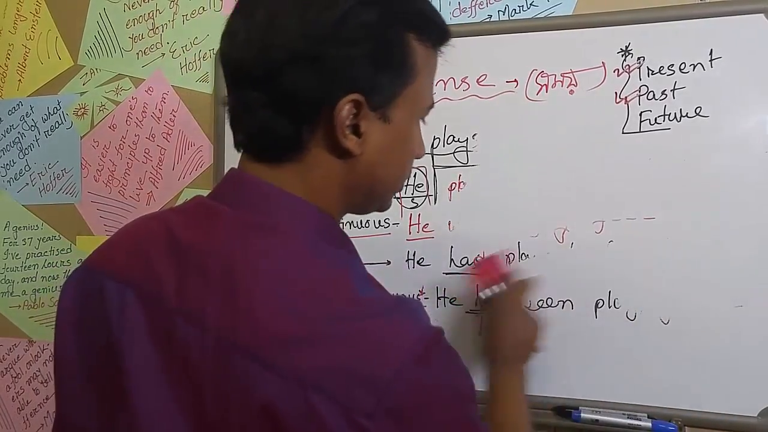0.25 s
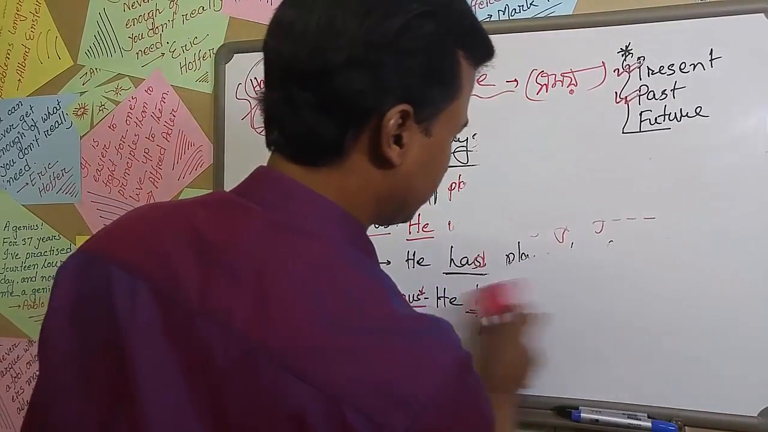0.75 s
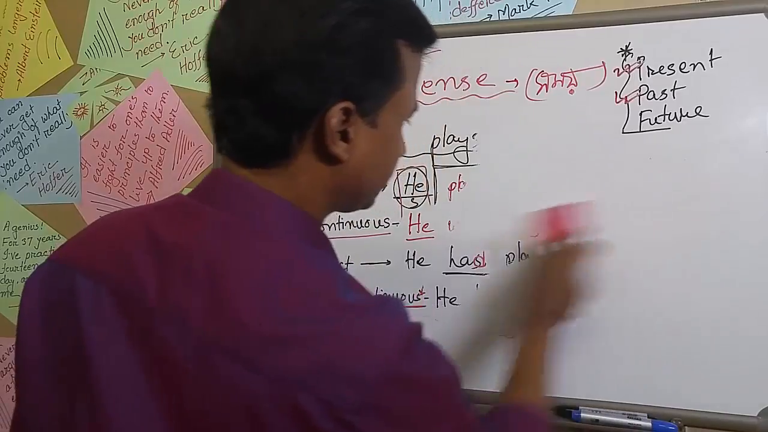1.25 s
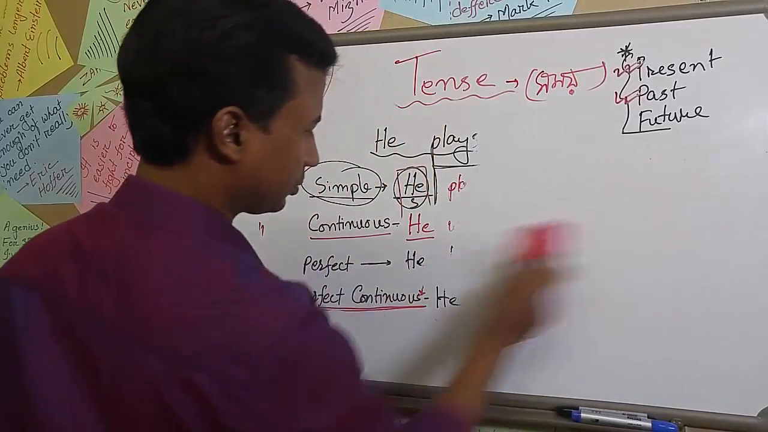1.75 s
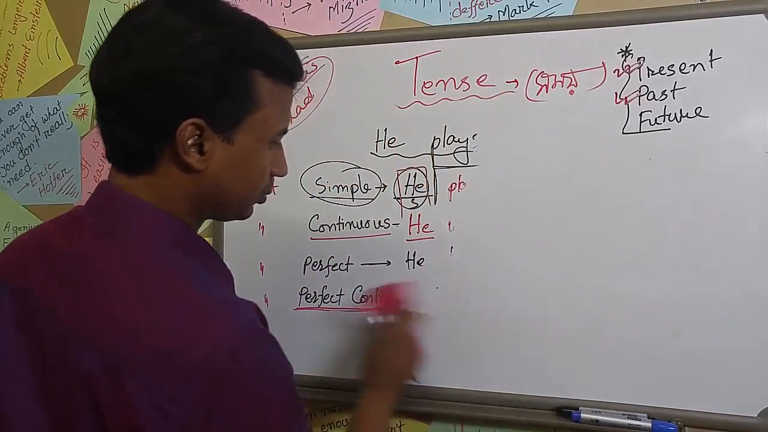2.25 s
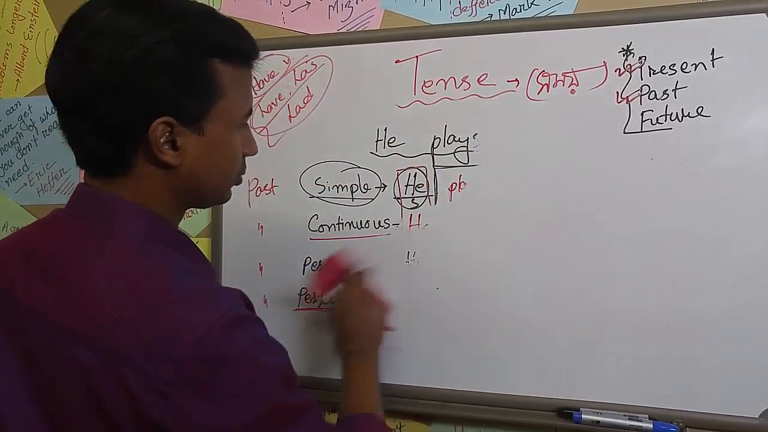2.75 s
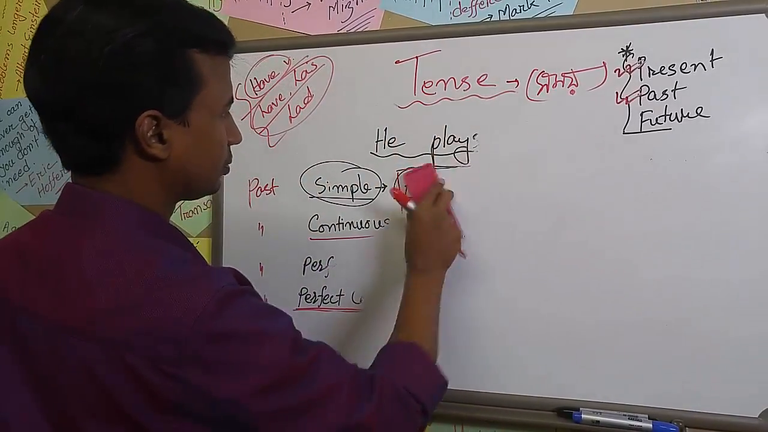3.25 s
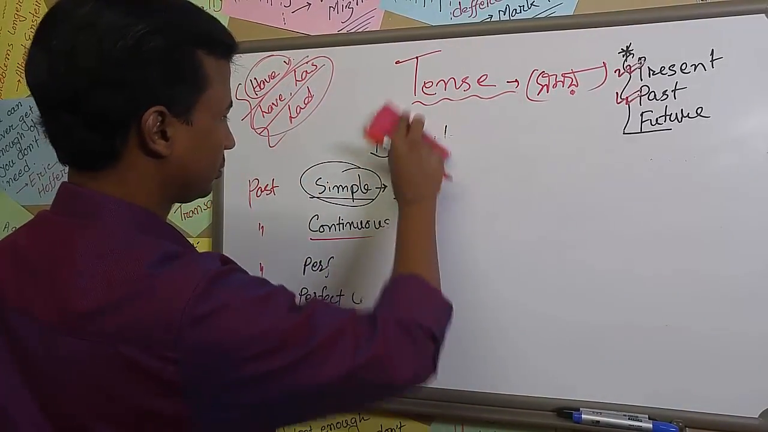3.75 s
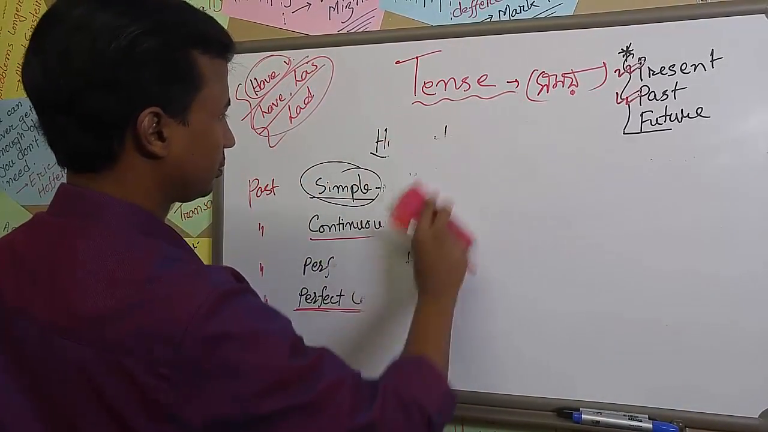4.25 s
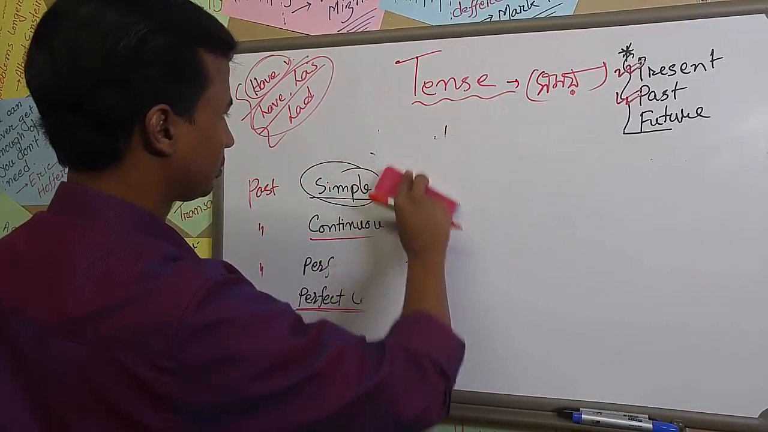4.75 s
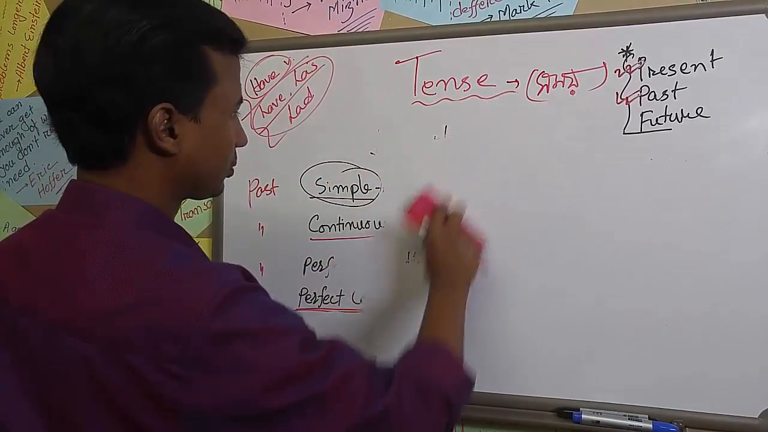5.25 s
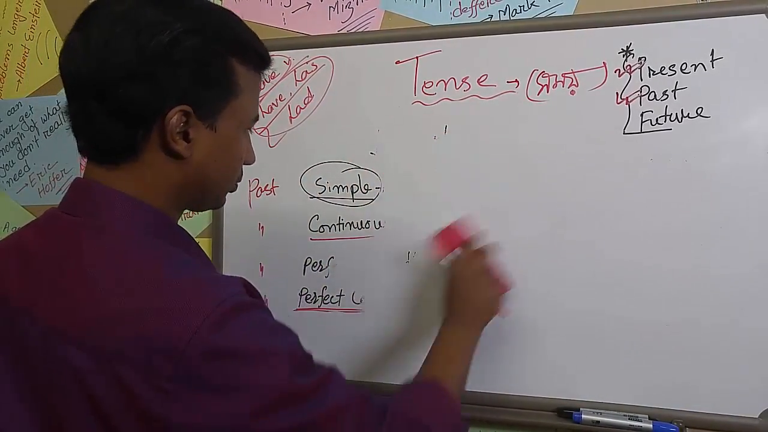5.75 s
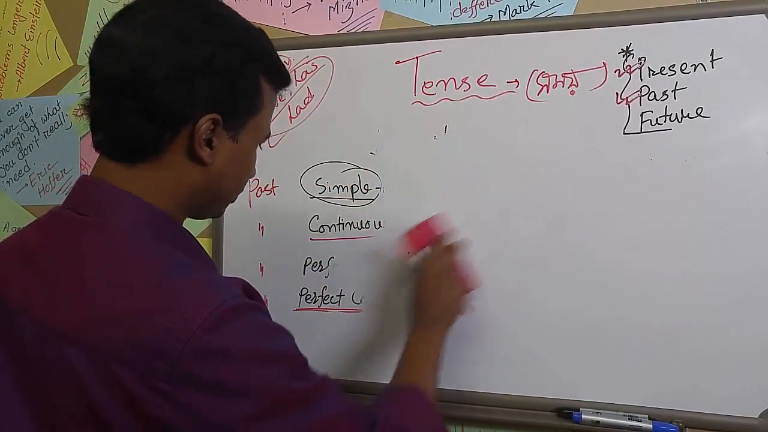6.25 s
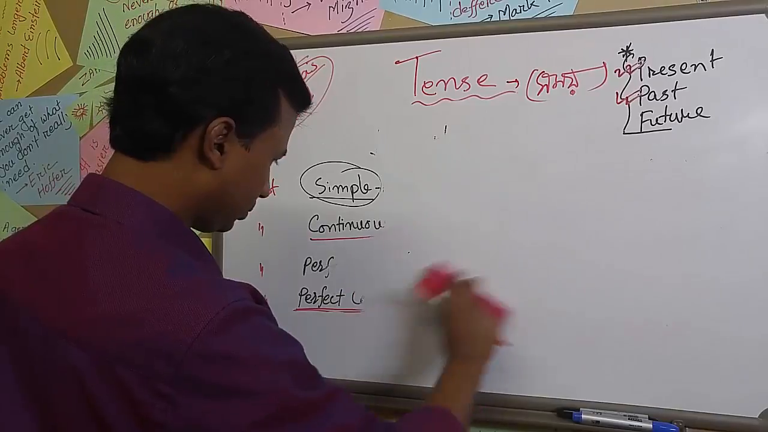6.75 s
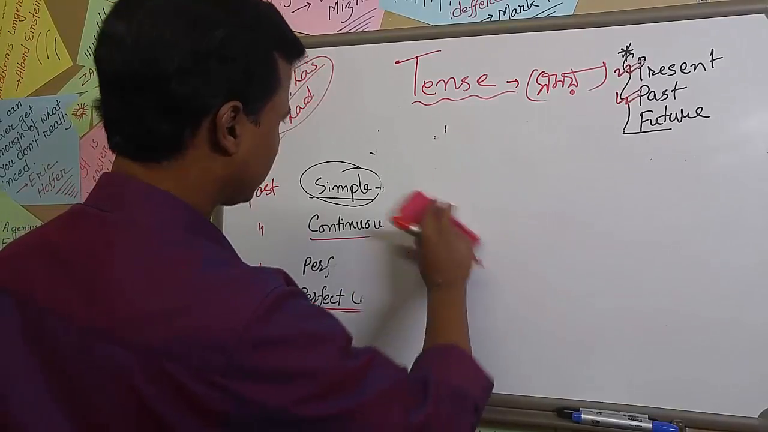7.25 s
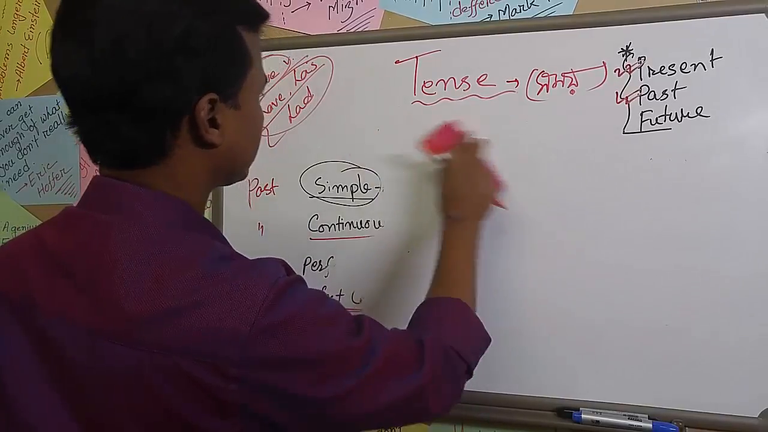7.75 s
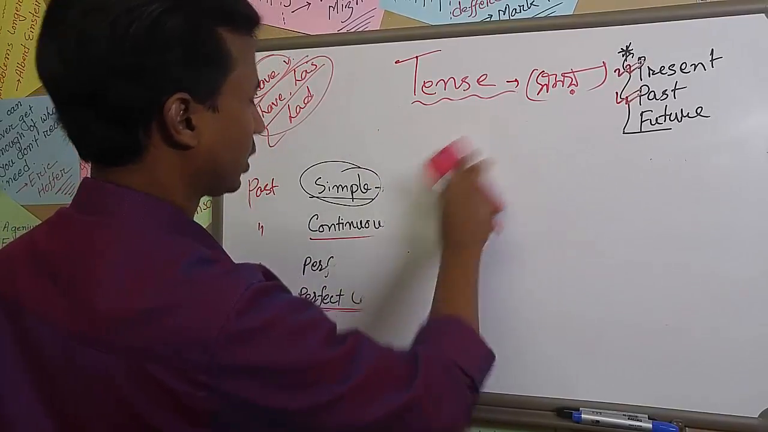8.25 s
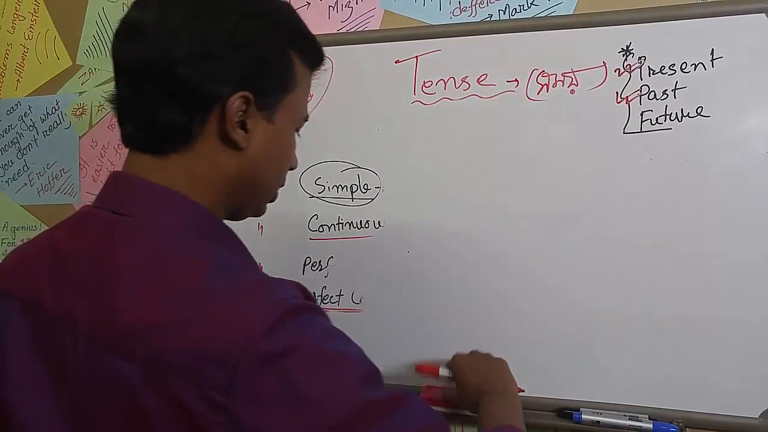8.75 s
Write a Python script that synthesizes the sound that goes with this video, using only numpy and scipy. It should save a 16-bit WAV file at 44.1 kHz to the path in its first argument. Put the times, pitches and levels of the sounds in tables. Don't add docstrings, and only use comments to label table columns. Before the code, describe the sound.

A felt eraser swishes back and forth across a whiteboard in dry, hissing strokes, with a few hard knocks, then lands clunking on the tray.

```python
import sys
import numpy as np
from scipy import signal
from scipy.fft import rfft, irfft, next_fast_len
from scipy.io import wavfile
from scipy.ndimage import uniform_filter1d, map_coordinates

SR = 44100
rng = np.random.default_rng(int(sys.argv[2]) if len(sys.argv) > 2 else 0)


def to_wav(sig):
    pcm = np.clip(np.atleast_2d(sig), -1, 1) * 32767
    pcm = np.round(pcm).astype(np.int16)
    wavfile.write(sys.argv[1], SR, pcm.T)


def natural_amplitude(level_db):
    exponent = np.asarray(level_db, float) / 20
    return 10 ** exponent


N = 396900

# pitch_hz, level_db [dB per Hz]
FELT = [(2350, -41), (4000, -18.5), (6000, -10), (7700, -6.5), (8260, -1), (8800, 1.5), (10000, -11),
        (11000, -35)]
# pitch_hz, level_db [dB per Hz]
SHEEN = [(9000, -22.5), (10300, 2.5), (11300, -1), (12800, -3), (13800, -13.5), (15500, -35.5)]
# pitch_hz, level_db [dB per Hz]
PRESS = [(900, -14), (1500, -9.5), (2300, -2.5), (3600, -0.5), (4600, 1), (6500, -5), (7600, -18)]
# pitch_hz, level_db [dB per Hz]
BOARD = [(120, -17.5), (220, -1), (420, -3), (506, -1.5), (680, -0.5), (1000, -5), (1600, -9), (2500, -22)]
# pitch_hz, level_db [dB per Hz]
RUMBLE = [(15, -35), (30, -8), (60, 1), (120, -6), (200, -9), (320, -31)]
# time_s, level_db
LEAN = [(0.0, -96), (0.25, -75.5), (0.42, -78.5), (0.82, -78.5), (1.1, -78), (3.11, -81), (3.16, -83.5),
        (3.93, -79.5), (4.18, -79.5), (4.76, -82), (4.96, -81), (6.64, -80.5), (7.09, -81), (7.42, -78),
        (8.0, -81.5), (8.52, -81.5), (8.82, -71), (9.0, -71)]


def eraser():
    hiss_db, press_db = strokes()
    sway_s = 0.29
    sway_db = uniform_filter1d(hiss_db, round(sway_s * SR))
    hiss_db = hiss_db + hush_db() + 0.36 * wobble(23)
    felt = natural_amplitude(hiss_db + 1.0) * rush(FELT, patchy_db=2.8, grain_db=0.33)

    sheen_db = -77.5 + 0.63 * (hiss_db + 68.0)
    sheen = natural_amplitude(sheen_db) * rush(SHEEN, patchy_db=5.0, grain_db=-1.5)

    lower_db = hiss_db + np.minimum(press_db, -3) + 1.5
    press = natural_amplitude(lower_db) * rush(PRESS, patchy_db=3.0, grain_db=0.56)

    board_db = curves(LEAN)[0] + 6 + 0.48 * (hiss_db + 67.5)
    board_db = np.minimum(board_db, -59)
    murmur = natural_amplitude(board_db) * rush(BOARD, patchy_db=3.0, grain_db=-1.1)

    rumble_db = -76.5 + 0.39 * (sway_db + 64.5) + 1.9 * wobble(9)
    rumble = natural_amplitude(rumble_db) * rush(RUMBLE, patchy_db=2.5, size=4096)
    return felt + sheen + press + murmur + rumble


# top_speed_s, hiss_level_db, speeding_up_s, slowing_down_s, pressure_db
PAD_STROKES = [(0.178, -65.5, 0.43, 0.038, -12), (0.297, -48, 0.023, 0.1, -3.5),
               (0.463, -51.5, 0.26, 0.061, -11), (0.672, -59.5, 0.28, 0.1, -9.5),
               (0.756, -42, 0.026, 0.059, -10), (0.955, -64.5, 0.39, 0.078, -7), (0.98, -59, 0.078, 0.063, -6),
               (1.065, -43.5, 0.03, 0.14, -3), (1.08, -40, 0.011, 0.05, -16), (1.191, -52.5, 0.21, 0.14, -10),
               (1.508, -46, 0.15, 0.088, -8.5), (1.634, -63.5, 0.12, 0.034, -7.5), (1.688, -63, 0.12, 0.33, -10),
               (1.969, -60.5, 0.15, 0.014, -9.5), (2.033, -42, 0.078, 0.051, -7),
               (2.171, -52, 0.25, 0.13, -12.5), (2.478, -59.5, 0.3, 0.077, -9), (2.642, -54, 0.16, 0.096, -10.5),
               (2.684, -58, 0.019, 0.14, -16), (2.912, -41, 0.084, 0.097, -12), (3.128, -41, 0.062, 0.11, -12),
               (3.426, -60, 0.14, 0.044, -7.5), (3.541, -62, 0.18, 0.13, -8.5), (3.696, -50.5, 0.087, 0.083, -10),
        (3.841, -66.5, 0.15, 0.1, -12), (4.053, -50.5, 0.15, 0.1, -9), (4.198, -58, 0.062, 0.19, -11),
        (4.453, -61.5, 0.25, 0.084, -9.5), (4.659, -66, 0.34, 0.2, -9), (4.854, -62, 0.19, 0.14, -9),
        (5.053, -67.5, 0.27, 0.076, -11.5), (5.285, -61, 0.24, 0.12, -10.5), (5.448, -63, 0.14, 0.32, -10),
        (5.696, -63.5, 0.16, 0.32, -10), (5.8, -50.5, 0.083, 0.054, -10), (5.952, -61.5, 0.17, 0.14, -11.5),
        (6.11, -62, 0.11, 0.11, -11.5), (6.18, -65, 0.042, 0.08, -27), (6.188, -52.5, 0.12, 0.028, -14.5),
        (6.279, -55, 0.12, 0.097, -13.5), (6.506, -57.5, 0.18, 0.064, -12.5),
        (6.62, -59.5, 0.18, 0.09, -14),
               (6.792, -58, 0.17, 0.16, -8.5), (6.932, -58.5, 0.15, 0.093, -12),
             (7.103, -69, 0.04, 0.95, -11), (7.312, -64, 0.414, 0.14, -13.5),
             (7.442, -63, 0.14, 0.062, -11), (7.549, -61.5, 0.28, 0.13, -13),
             (7.663, -58, 0.13, 0.12, -13.5), (7.909, -63, 0.22, 0.21, -10),
             (8.116, -60.5, 0.089, 0.23, -12.5), (8.252, -64.5, 0.044, 0.21, -15),
             (8.41, -67, 0.12, 0.81, -6), (8.459, -52.5, 0.011, 0.1, -11), (8.85, -69.5, 0.16, 0.61, 2),
             (8.928, -52, 0.015, 0.066, -3),
               (2.82, -63.5, 0.085, 0.077, -9), (3.03, -70, .08, 0.068, -6), (3.103, -47, 0.032, 0.041, -15),
          (3.34, -72.5, 0.15, 0.091, -6), (.55, -73, .06, 0.089, -4), (5.36, -89, .06, 0.053, -11),
          (1.43, -55, .03, 0.069, -1)]


def strokes():
    depth_db, bend = 29.5, 1.39
    rest_db, rest_press_db = -88, -4.5
    t = np.arange(N // 64 + 2) * 64 / SR
    rows = PAD_STROKES
    s, db, rise, fall, press_db = np.transpose(rows)[:, :, None]
    away = np.where(t < s, (s - t) / rise, (t - s) / fall)
    power = natural_amplitude(2 * (db - depth_db * away ** bend))
    hiss = power.sum(axis=0) + natural_amplitude(2 * rest_db)
    lower = (power * natural_amplitude(2 * press_db)).sum(axis=0) + natural_amplitude(2 * (rest_db + rest_press_db))
    return curves(np.transpose([t, 10 * np.log10(hiss), 10 * np.log10(lower / hiss)]))


def hush_db():
    lift_s, set_down_s, fade_s = 8.665, 8.795, 0.023
    t = np.arange(N) / SR
    in_air_s = np.minimum(t - lift_s, set_down_s - t)
    return -8.5 * np.clip(in_air_s / fade_s + 0.5, 0, 1)


# pitch_hz, width_hz, level_db
FLAT = [(666, 49, -3.5), (803, 82, -7.5), (938, 20.2, -17), (1179, 26, -7), (1330, 66, -10.5),
        (1692, 75, -17), (2246, 29.3, -17.5), (2420, 26, -15), (2768, 39, -16.5), (2960, 32, -13),
        (3600, 20, -20.5), (3830, 24, -16), (3915, 44, -30)]
BELLY = [(265, 58, -2.6), (331, 82, 0.67)]
CHIRP = [(5700, 150, -12), (7250, 170, 2), (8150, 170, 2), (9170, 200, -5)]
NUDGE = [(2084, 70, 0)]
TILTED = [(342, 115, -10.5), (673, 54, -1.5), (909, 33, -3.5), (1144, 37, -11), (1524, 150, -13),
          (1970, 52, -27), (2410, 64, -22)]
EDGE = [(282, 35, -1.5), (618, 18, -4.5), (772, 60, -4), (1022, 19, -16), (1390, 33, -12)]
CORNER = [(638, 70, 2), (894, 150, -0.5), (1524, 19, -7)]
PANEL = [(268, 42, -6.5), (650, 50, -21), (1100, 24, -30.5)]
GRIP = [(617, 27, -12.5), (838, 39, -5.5), (1057, 83, -1), (1550, 53, -10.5), (1750, 27, -22)]
SHELL = [(1025, 21, -12.5), (1390, 42, -10.5), (1860, 31, -9), (2057, 70, -3.5), (2287, 39, 0)]
SCUFF = [(3750, 68, -13), (7110, 150, 4), (7840, 170, 3)]
LIP = [(230, 125, -5), (655, 150, 0.5), (990, 20, -8), (1273, 110, -7.5), (1860, 28, -21.5),
       (2720, 85, -34.5)]
TRAY = [(176, 16, 5), (223, 49, 3), (372, 17, -18.5)]
TRAY_TOP = [(583, 44, -1), (723, 55, 0.5), (1003, 41, -14), (1520, 17, -22), (1870, 55, -23.5),
            (2055, 49, -25), (3160, 38, -51), (3550, 8.9, -25), (3800, 21, -34), (2280, 34, -28),
            (4700, 44, -34), (5750, 42, -31)]
SQUEAK = [(5200, 200, 0), (8240, 140, -5), (9100, 280, 6)]
DRONE = [(424, 63, -2), (714, 180, 3), (970, 61, -3)]
# start_s, peak_level_db, rise_s, rattle_t60_s, hardness_db [dB per octave]
HITS = [(FLAT, [(1.0598, -22, .0006, 0.075, -1), (1.072, -22.5, .004, 0.087, -1.5),
        (1.083, -30, .003, 0.089, -1)]), (BELLY, [(1.0615, -23, .003, 0.1, 6)]),
        (CHIRP, [(.288, -41.5, .004, 0.21, 0)]), (NUDGE, [(8.896, -62, .004, .12, 0),
        (8.931, -48.5, .003, .05, 0), (1.047, -53.5, 0.0042, .06, 0)]),
        (TILTED, [(.2885, -34, .002, 0.038, 0), (.295, -32, .002, 0.091, -2),
        (.3062, -29.5, .001, 0.041, 0.5)]), (EDGE, [(1.0225, -56, .002, 0.099, 2),
        (1.394, -38, .003, 0.036, 1), (1.404, -43, .006, 0.12, 0)]),
        (CORNER, [(1.999, -47, 0.0031, 0.16, 7.5)]), (PANEL, [(2.089, -32.5, 0.0042, 0.013, -8),
        (2.107, -39.5, .003, 0.014, 0.5), (2.744, -57.5, .004, 0.023, -7.5), (2.762, -56, .003, 0.027, -17),
        (7.208, -45, 0.0063, 0.078, 1.5)]), (GRIP, [(6.764, -46, 0.01, 0.1, 6),
        (6.781, -38.5, 0.00202, 0.054, -0.5)]), (SHELL, [(.745, -53.5, 0.011, 0.11, -10),
        (.962, -56, 0.0072, 0.066, -7.5), (7.208, -42.5, 0.00304, 0.083, 4)]),
        (SCUFF, [(8.449, -46.5, 0.0023, 0.2, 3)]), (LIP, [(8.64, -57.5, .002, 0.12, 12),
        (8.79, -48, 0.017, 0.19, 1)]), (TRAY, [(8.912, -19.5, .008, 0.091, 9),
        (8.953, -30.5, .008, 0.22, 0)]), (TRAY_TOP, [(8.918, -26, 0.004, 0.056, 0.5),
        (8.928, -24, .002, 0.057, 1.5), (8.945, -35, 0.003, .25, 1.5)]),
        (SQUEAK, [(6.16, -40, 0.021, 0.12, 5), (6.26, -50, .03, 0.25, 3)]),
        (LIP, [(8.812, -55.5, .012, 0.24, 1.5)]), (CORNER, [(7.33, -64, .08, 0.43, -16)]),
        (DRONE, [(4.26, -59.5, 0.066, 0.47, -7), (4.79, -63, .04, 0.32, 4), (8.3, -60, .05, 0.37, 13),
        (1.43, -59, .03, 0.17, -10)])]


def knocks():
    out = np.zeros((2, N + SR))
    t = np.arange(SR // 4) / SR
    for body, hits in HITS:
        for s, db, rise, t60, hard_db in hits:
            rattle = rng.standard_normal((2, len(t))) * np.minimum(t / rise, 1) * natural_amplitude(-60 * t / t60)
            rattle[0, round(rise * SR)] += 7.6
            tilted_body = [(c, w, level + hard_db * np.log2(c)) for c, w, level in body]
            ring = ports(rattle, tilted_body)
            peak = np.abs(ring.mean(axis=0)).max()
            out[:, round(s * SR):][:, :len(t)] += natural_amplitude(db) * ring / peak
    return out[:, :N]


# pitch_hz, left_right_likeness
ALIKE_KNOCK = [(100, 0.92), (400, 0.97), (700, 0.67), (1300, 0.18), (15000, .02)]


def ports(pair, body):
    m = next_fast_len(pair.shape[1] + 4096)
    f, z = np.fft.rfftfreq(m, 1 / SR), rfft(pair, m)
    total = 0
    for c, w, db in body:
        mode = (1j * f * 1.8 * w / (c * c - f * f + 1j * f * 1.62 * w)) ** 2
        rung = z * mode
        strength = np.linalg.norm(mode) / np.linalg.norm(rung, axis=1, keepdims=True)
        total = total + natural_amplitude(db) * rung * strength
    return irfft(mixed(*total, f, ALIKE_KNOCK), m)[:, :pair.shape[1]]


# start_s, level_db, pitch_hz, t60_s
THUDS = [(0.293, -58, 103, 0.15), (1.063, -27.5, 140, 0.11), (1.402, -49, 64.4, 0.17),
         (1.408, -44, 151, 0.056), (1.82, -53, 75.4, 0.096), (2.372, -62.5, 122, 0.27),
         (2.748, -54, 193, 0.13), (4.279, -63, 310, 0.12), (4.831, -61.5, 279, 0.14),
         (7.21, -48.5, 140, 0.062), (7.215, -57, 64.6, .15), (8.18, -59, 171, 0.088),
         (8.918, -34.5, 110.4, 0.194)]


def thuds():
    out = np.zeros(N + SR)
    t = np.arange(SR // 2) / SR
    for s, db, hz, t60 in THUDS:
        swell = natural_amplitude(db - 60 * t / t60) * (1 - np.exp(-t / 0.0071))
        out[round(s * SR):][:len(t)] += swell * np.sin(2 * np.pi * hz * t)
    return out[:N]


# start_s, level_db, t60_s
CRACKS = [
    (0.295, -45, 0.15),
    (1.0598, -30, 0.17),
    (1.401, -55, 0.49),
    (8.45, -79, 0.11),
    (8.915, -75, 0.22),
]
# pitch_hz, level_db [dB per Hz]
CRACK = [(500, -15), (900, 1), (1500, -3.5), (3000, 4.5), (7000, -1), (8600, -19), (11000, -11),
         (13000, -22), (15500, -28.5)]


def cracks():
    shape = np.zeros(N + SR)
    t = np.arange(SR // 2) / SR
    for s, db, t60 in CRACKS:
        spray = natural_amplitude(-60 * t / t60) * np.minimum(t / 0.0041, 1)
        click = natural_amplitude(13.5 - 60 * t / 0.0027) * np.minimum(t / 0.0005, 1)
        shape[round(s * SR):][:len(t)] += natural_amplitude(db) * (spray + click)
    return shape[:N] * rush(CRACK, patchy_db=-1.5)


# pitch_hz, level_db [dB per Hz]
AIR = [(120, -11.5), (250, -0.5), (410, 2), (509, -3), (631, 3.5), (1300, -8), (2200, -6.5), (4000, -12.5),
       (7700, -17.5), (8810, -9.5), (10500, -12), (12800, -20), (14200, -28), (15500, -44)]


def room_tone():
    level_db = -76.5 + hush_db() + 0.86 * wobble(2.9) + 0.36 * wobble(9.0)
    return natural_amplitude(level_db) * rush(AIR, patchy_db=3.0)


# pitch_hz, left_right_likeness
ALIKE = [(60, 0.14), (300, 0.25), (700, .17), (1500, 0.067), (15000, 0.037)]


def rush(spectrum, patchy_db, grain_db=0, size=512):
    hop, hz = size // 2, np.fft.rfftfreq(size, 1 / SR)
    shape = (N // hop + 2, len(hz))
    z = rng.standard_normal((2, *shape)) + 1j * rng.standard_normal((2, *shape))
    field = uniform_filter1d(rng.standard_normal(shape), size=6, axis=0)
    field = uniform_filter1d(field, size=3, axis=1)
    z = z * natural_amplitude(along(spectrum, hz) + patchy_db * unit(field))
    frames = irfft(mixed(*z, hz, ALIKE), size) * np.sin(np.pi * np.arange(size) / size)
    pair = (frames[:, 1:, :hop] + frames[:, :-1, hop:]).reshape(2, -1)[:, :N]
    return unit(pair * natural_amplitude(grain_db * wobble(250)))


def mixed(mid, side, hz, alike):
    turn = np.arccos(np.clip(along(alike, hz), -1, 1)) / 2
    left = np.cos(turn) * mid + np.sin(turn) * side
    right = np.cos(turn) * mid - np.sin(turn) * side
    return np.array([left, right])


def unit(x):
    return x / np.sqrt(np.mean(x ** 2) + 1e-20)


def along(points, hz):
    f, v = np.transpose(points)
    return np.interp(np.log(hz + 1), np.log(f + 1), v)


def curves(rows):
    s, *cols = np.transpose(rows)
    return [np.interp(np.arange(N) / SR, s, c) for c in cols]


def wobble(rate):
    knots = rng.standard_normal(N // 100)
    coarse = map_coordinates(knots, [np.arange(N // 16 + 2) * 16 * rate / SR])
    return np.interp(np.arange(N) / 16, np.arange(len(coarse)), coarse)


def filtered(x, response):
    m = next_fast_len(x.shape[-1] + 8192)
    return irfft(rfft(x, m) * response(np.fft.rfftfreq(m, 1 / SR)), m)[..., :x.shape[-1]]


def scene():
    return eraser() + knocks() + thuds() + cracks() + room_tone()


def top_cut(x):
    return signal.sosfilt(signal.butter(12, 15720, fs=SR, output="sos"), x)


def record(dry):
    def dip(hz):
        return 1 - 0.8 * 115j * hz / (510 ** 2 - hz ** 2 + 115j * hz)

    mix = filtered(dry, dip) - 0.0003
    return top_cut(mix)


dry = scene()
out = record(dry)
to_wav(out)
```